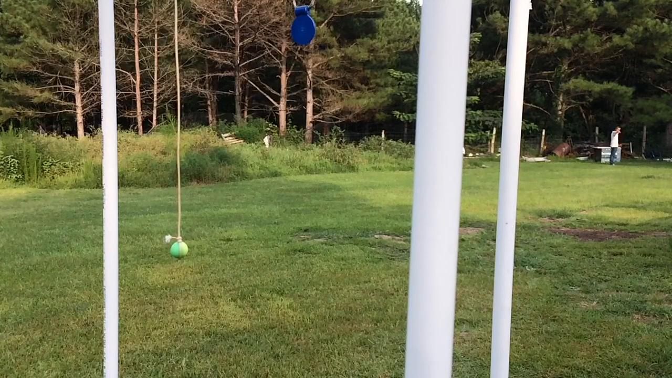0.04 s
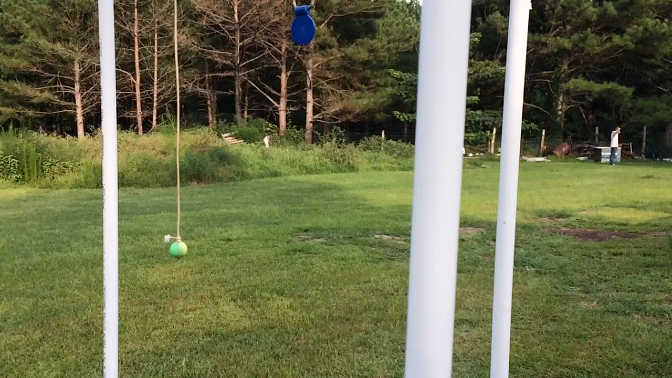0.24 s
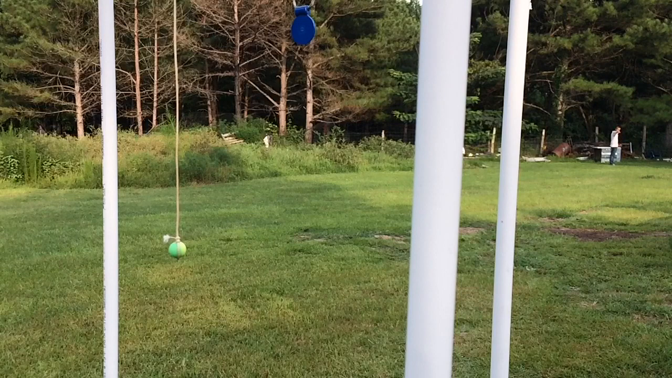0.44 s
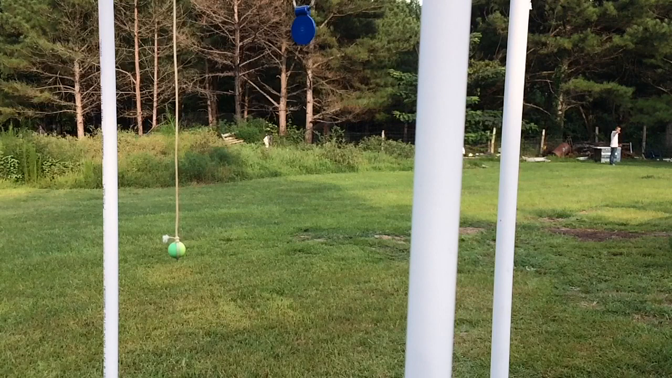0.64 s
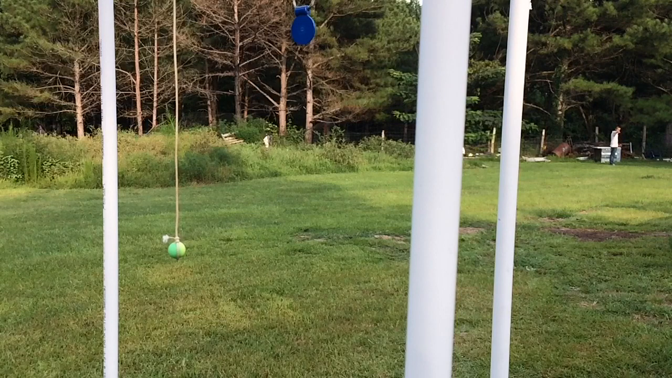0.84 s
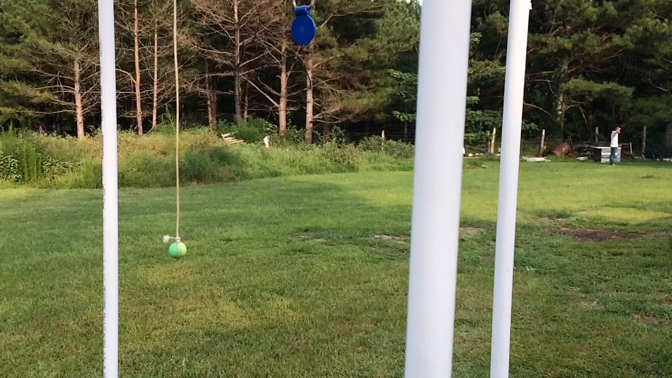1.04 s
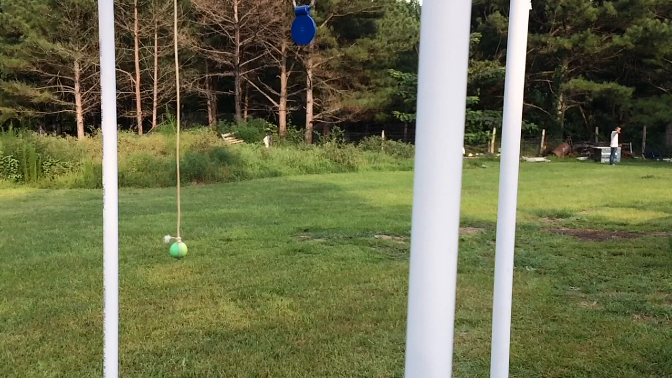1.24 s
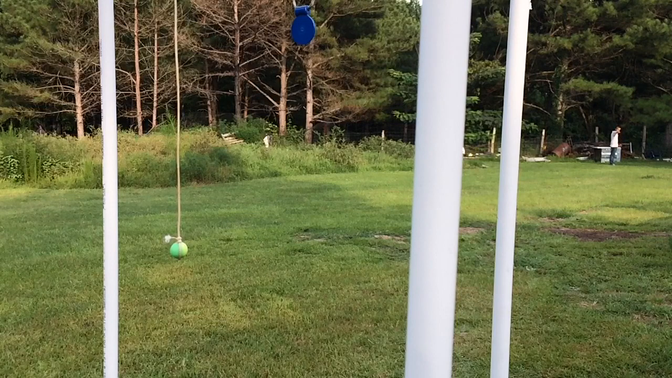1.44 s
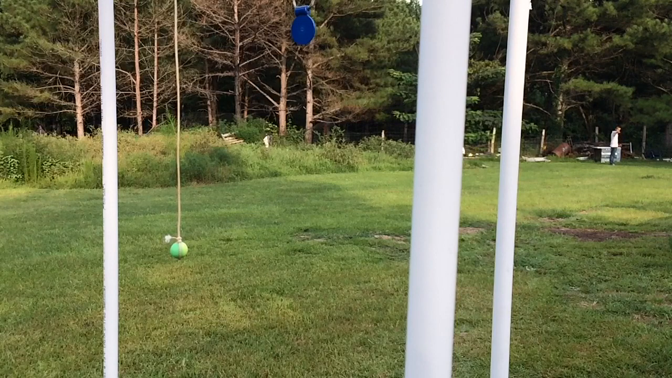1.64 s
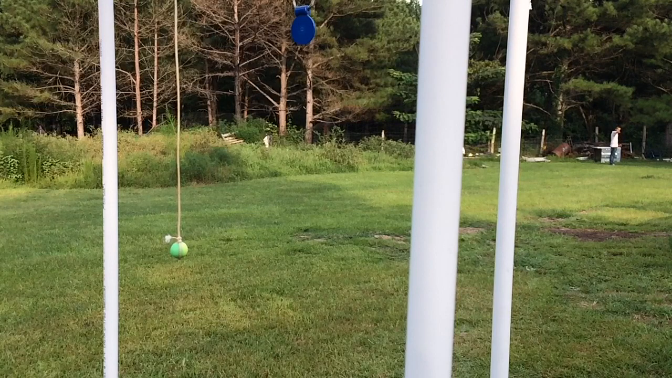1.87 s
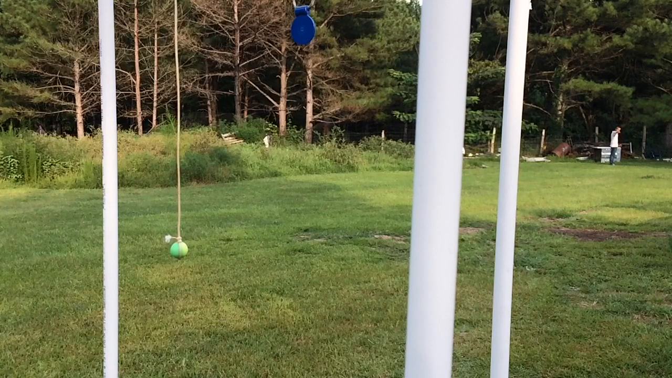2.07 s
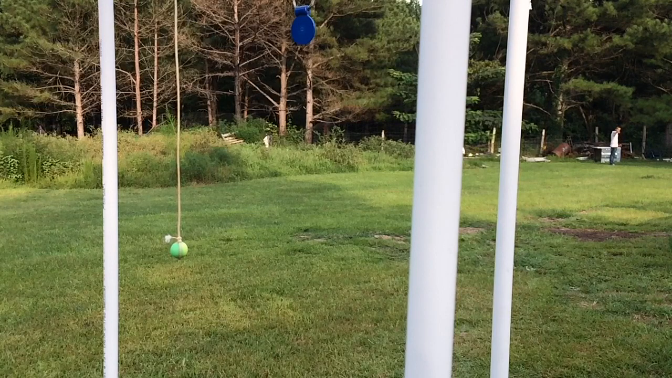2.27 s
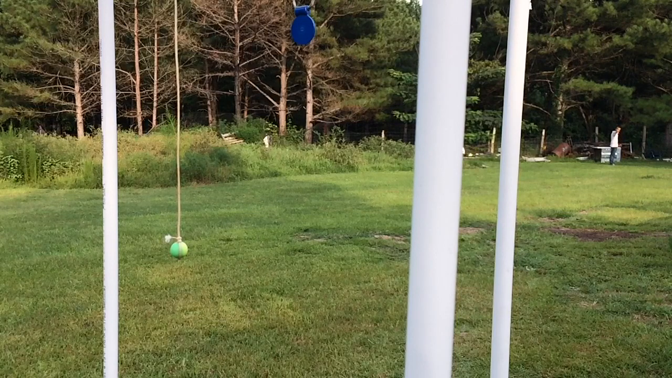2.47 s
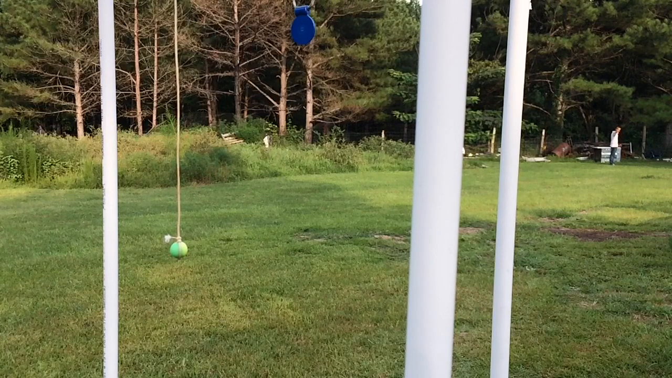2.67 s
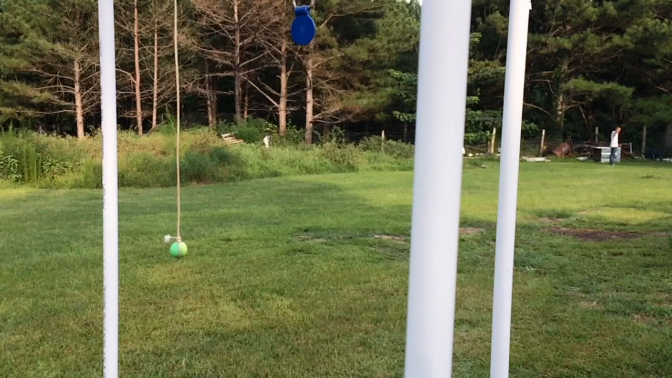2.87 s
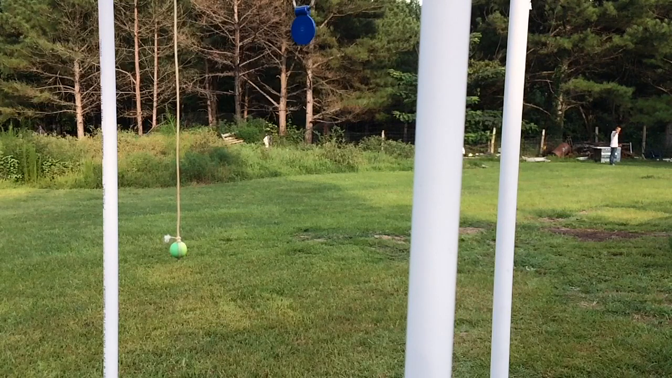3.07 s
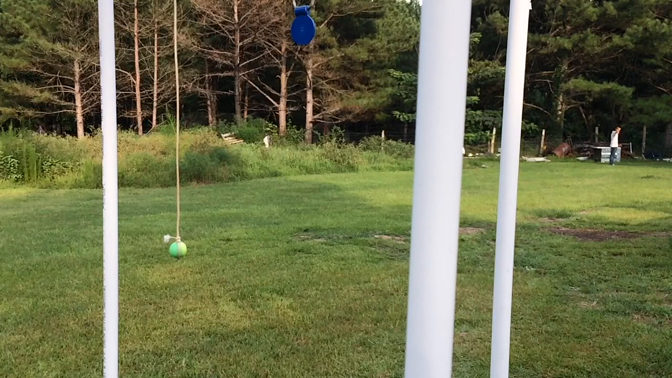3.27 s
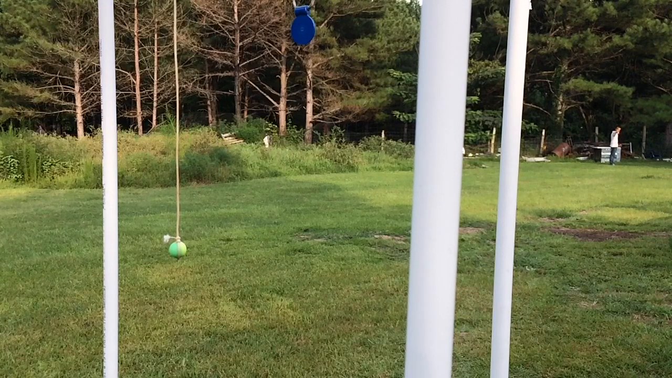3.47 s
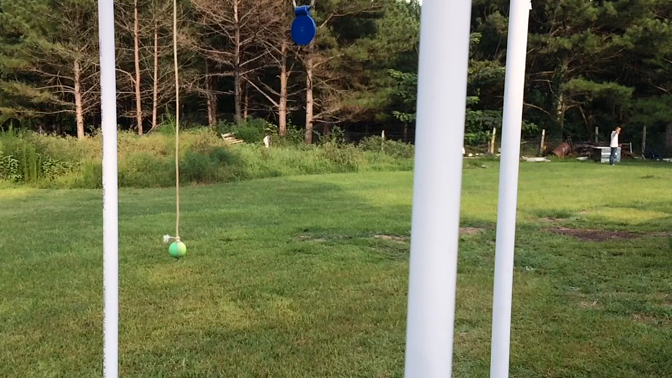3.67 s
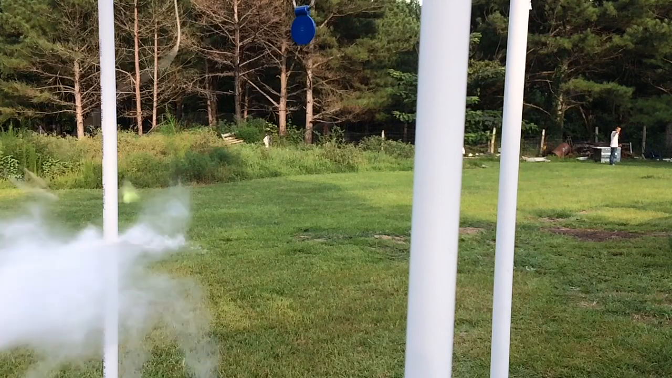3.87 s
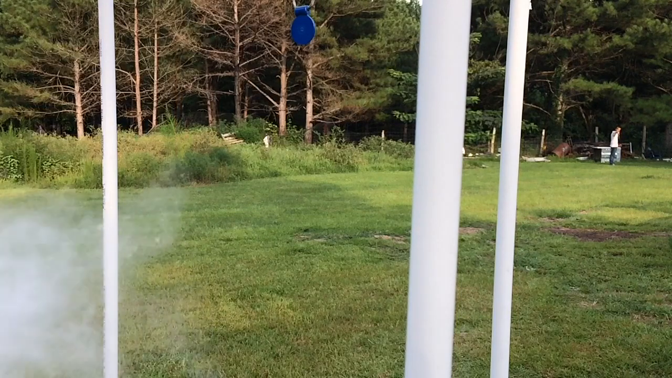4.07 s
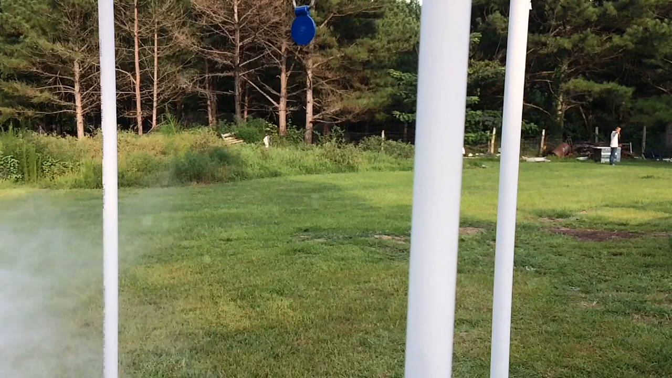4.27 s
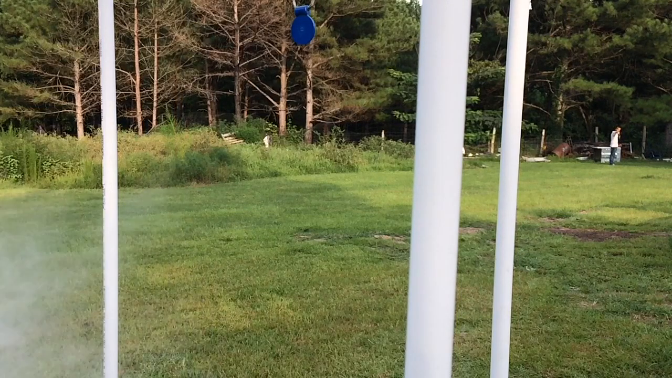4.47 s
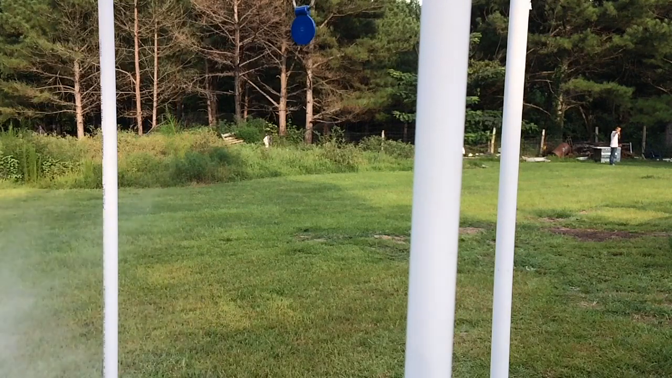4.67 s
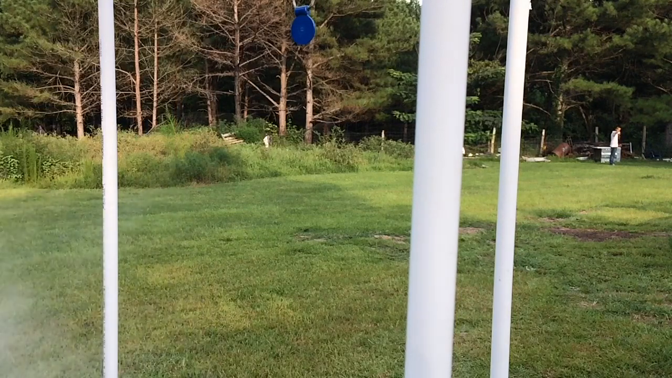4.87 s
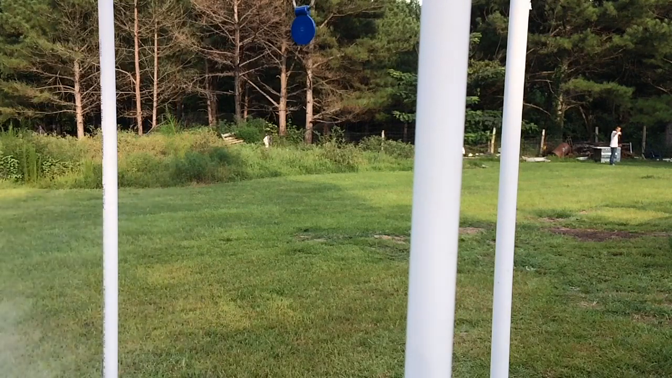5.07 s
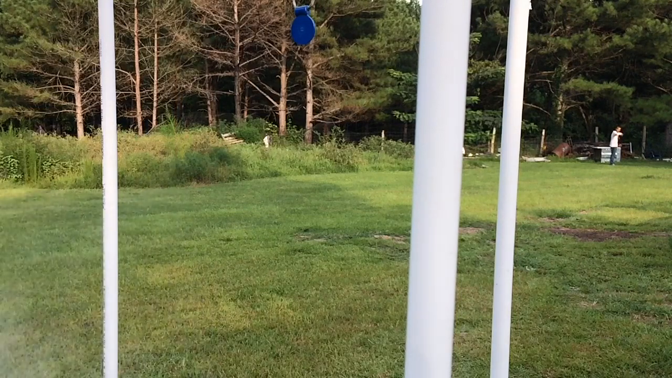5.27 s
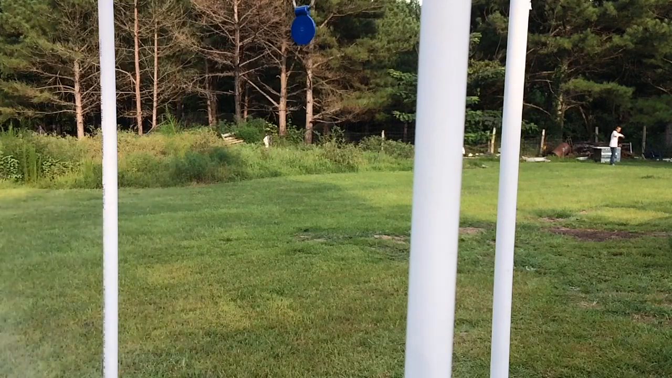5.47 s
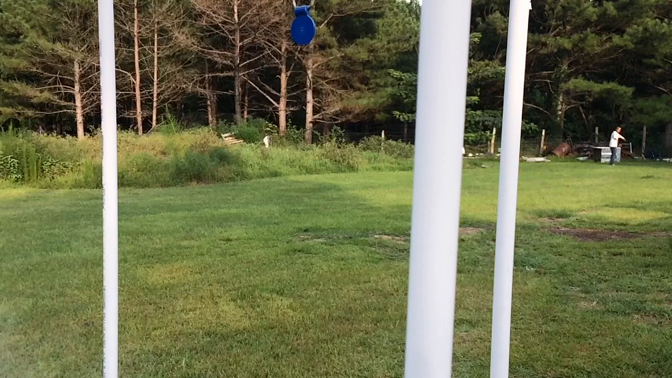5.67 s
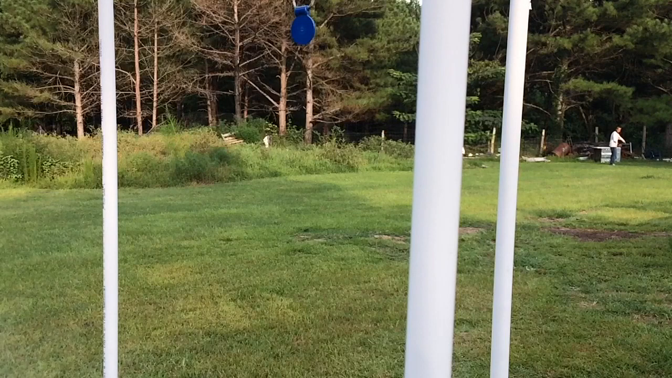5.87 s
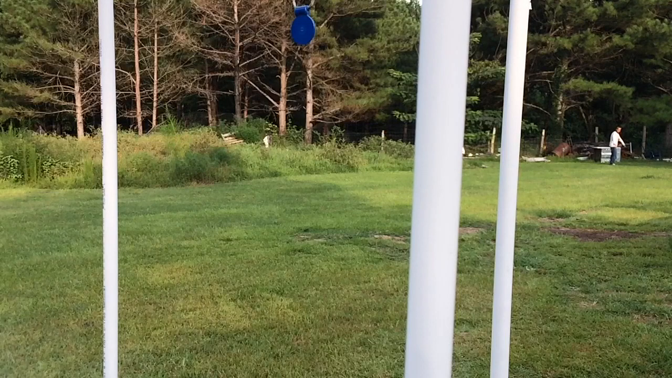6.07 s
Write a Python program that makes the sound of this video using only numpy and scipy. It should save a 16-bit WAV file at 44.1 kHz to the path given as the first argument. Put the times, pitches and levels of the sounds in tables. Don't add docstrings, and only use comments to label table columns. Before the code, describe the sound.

Insects trill on an open lawn, slow down two octaves, then a deep slingshot twang, sharp crack, growing hiss and a huge burst with pattering scraps.

```python
import sys
import numpy as np
from scipy import signal
from scipy.fft import rfft, irfft
from scipy.io import wavfile
from scipy.ndimage import uniform_filter1d, map_coordinates

SR = 44100
rng = np.random.default_rng(int(sys.argv[2]) if len(sys.argv) > 2 else 0)


def transcribe(signal):
    frames = np.atleast_2d(signal).T
    limited = np.clip(frames, -1, 1)
    pcm = np.round(limited * 32767).astype(np.int16)
    wavfile.write(sys.argv[1], SR, pcm)


def volts_from_db(level):
    exponent = np.asarray(level, float) / 20
    return 10 ** exponent


N = 269892

SLOWING = 4
LAWN_N = 3 * SR
BURST_S = 4.0537


def colour(x, points):
    hz, db = np.transpose(points)
    f = np.fft.rfftfreq(len(x), 1 / SR) + 1e-3
    gain = volts_from_db(np.interp(np.log(f), np.log(hz), db, left=-90, right=-90))
    y = irfft(rfft(x) * gain, len(x))
    return y / y.std()


def band(x, low_hz, high_hz, order=3):
    y = signal.sosfilt(signal.butter(order, [low_hz, high_hz], "band", fs=SR, output="sos"), x)
    return y / y.std()


def drift(rate_hz, size):
    r = np.exp(-2 * np.pi * rate_hz / SR)
    y = signal.lfilter([1], [1, -2 * r, r * r], rng.standard_normal(size + SR))[SR:]
    return (y - y.mean()) / y.std()


def ring(x, hz, t60_s):
    r = volts_from_db(-60 / (t60_s * SR))
    w = 2 * np.pi * hz / SR
    return signal.lfilter([0, np.sin(w)], [1, -2 * r * np.cos(w), r * r], x)


def playback():
    frame_s, first_frame_s = 1 / 30, 1.122
    ease_start_s, ease_end_s = 1.14, 1.635
    t = np.arange(N) / SR
    middle = first_frame_s + (np.floor((t - first_frame_s) / frame_s) + .5) * frame_s
    u = np.clip((middle - ease_start_s) / (ease_end_s - ease_start_s), 0, 1)
    speed = (1 / SLOWING) ** (u * u * (3 - 2 * u))
    splice_s = (np.diff(speed, prepend=1) != 0) * 9e-6
    return np.cumsum(speed / SR + splice_s)


def true_time(heard_s, true_s):
    return np.interp(heard_s, np.arange(N) / SR, true_s)


# pitch_hz, level_db (per Hz)
AIR = [(20, -12), (45, 0.5), (110, 2), (200, -10.5), (400, -16.5), (900, -17), (1600, -22.5), (2500, -28),
       (4000, -28.5), (6200, -31.5), (10500, -32), (13600, -34.5), (15700, -31), (15900, -69.5)]


def open_air():
    return volts_from_db(-5) * colour(rng.standard_normal(LAWN_N), AIR) * volts_from_db(.5 * drift(6., LAWN_N))


# pitch_hz, level_db (per Hz)
CHORUS_BAND = [(5800, -40), (6150, -26), (6620, -12), (6860, -3), (7670, 1.5), (8090, 0.5), (8500, -8),
               (8800, -21), (9400, -30.5), (10200, -47)]


def cicadas():
    flicker_db = 0.4 * drift(45., LAWN_N) + 1.5 * drift(250., LAWN_N)
    return colour(rng.standard_normal(LAWN_N) * volts_from_db(flicker_db), CHORUS_BAND)


def cricket(hz, width_hz, per_s):
    turn = np.cumsum(per_s * (1 + 0.034 * drift(8., LAWN_N))) / SR
    strokes = 0.38 + np.sin(np.pi * turn) ** 4
    return band(rng.standard_normal(LAWN_N) * strokes, hz - width_hz / 2, hz + width_hz / 2)


def chirps(times_s, levels_db):
    chirp_s, between_db = .085, -13.5
    t = np.arange(LAWN_N) / SR
    level = volts_from_db(np.mean(levels_db) + between_db)
    for s, db in zip(times_s, levels_db):
        level = level + volts_from_db(db) * np.cos(np.pi * np.clip((t - s) / chirp_s, -.5, .5)) ** 2
    return level


# pitch_hz, width_hz, level_db
CRICKETS = [
    (9550, 200, -67.5),
    (9940, 480, -76.5),
]
# first_chirp_s, period_s
BEATS = [
    (.125, .248),
    (-.004, .1605),
]
# chirp_s, level_db
LOW_CRICKET = [(.055, -68.5), (.228, -65.5), (.42, -64.5), (.5, -67), (.622, -65), (.835, -65), (.92, -69),
               (1.045, -62.5), (1.3, -66), (2.06, -62), (2.72, -67.5), (3.42, -69), (4.42, -66),
               (5.298, -68), (5.79, -67.5)]


def crickets(true_s):
    heard_s, db = np.transpose(LOW_CRICKET)
    out = chirps(true_time(heard_s, true_s), db) * cricket(9170, 260., 122.)
    for (hz, width_hz, level_db), (first_s, period_s) in zip(CRICKETS, BEATS):
        beats = first_s + period_s * np.arange(20)
        out = out + chirps(beats, level_db + 0 * beats) * cricket(hz, width_hz, 112.)
    return out


# start_s, end_s, pitch_hz, level_db, throat_hz
CROW = [
    (0.752, 0.992, 589, -78, 1700),
    (0.95, 1.063, 595, -83, 1190),
    (1.176, 1.38, 590, -60.5, 880),
    (1.3, 1.535, 580, -72.5, 1190),
    (1.56, 2.53, 1165, -70.5, 1165),
]


def cock(true_s):
    db_per_khz, floor_db = 12, -23.5
    t, out = np.arange(LAWN_N) / SR, 0
    waver = 1 + 0.0028 * drift(6.6, LAWN_N)
    flutter = volts_from_db(1.3 * drift(25., LAWN_N))
    for start, end, hz, level_db, throat_hz in CROW:
        a, b = true_time([start, end], true_s)
        shape = np.clip(np.minimum((t - a) / .04, (b - t) / .045), 0, 1)
        phase = 2 * np.pi * hz * np.cumsum(waver) / SR
        for k in range(1, 8):
            db = level_db + max(-db_per_khz * abs(k * hz - throat_hz) / 1e3, floor_db)
            out = out + shape * volts_from_db(db) * np.sin(k * phase)
    return np.sqrt(2) * out * flutter


def drop_masked(x, stretch=1):
    mask_db, reach_hz, luck_db = -11.5, 2600, 2.5
    f, _, z = signal.stft(x, SR * stretch, "cosine", nperseg=2048 * stretch)
    power = (abs(z[:1024]) ** 2).reshape(64, 16, -1).mean(axis=1)
    centre = f[8:1024:16]
    above = centre[:, None] - centre
    mask = (volts_from_db(-40 * abs(above) / reach_hz) * (above > 0)) @ power
    luck = volts_from_db(2 * luck_db * rng.standard_normal(power.shape))
    keep = (power * luck > mask * volts_from_db(2 * mask_db)) | (centre[:, None] < 9400)
    z[:1024] *= np.repeat(keep, 16, axis=0)
    return signal.istft(z, SR * stretch, "cosine", nperseg=2048 * stretch)[1][:len(x)]


def lawn():
    true_s = playback()
    duck_s = true_time([BURST_S, BURST_S + .03, BURST_S + 1.0, BURST_S + 1.33], true_s)
    heard = np.interp(np.arange(LAWN_N) / SR, true_s, np.arange(N) / SR)
    duck = volts_from_db(np.interp(heard, [BURST_S, BURST_S + .03, BURST_S + 1.0, BURST_S + 1.33], [0, -5, -5, 0]))
    insects = volts_from_db(-56.5) * (cicadas() + open_air()) + crickets(true_s)
    x = drop_masked(duck * insects + cock(true_s))
    fine = 4
    dense = irfft(rfft(x), fine * LAWN_N) * fine
    return map_coordinates(dense, [true_s * SR * fine], order=3)


# peak_s, level_db, half_length_s
GUSTS = [
    (3.496, -70, 0.1),
    (4.85, -75, 0.33),
    (5.154, -70, 0.054),
    (5.294, -62.5, 0.082),
    (5.68, -64, 0.038),
    (6.13, -47.5, 0.032),
]


def rumble():
    level_db, hold_s, fall_db_per_s = -47, 0.23, 110
    t = np.arange(N) / SR
    since = t - BURST_S
    rise = np.clip((since - .04) / 0.036, 0, 1)
    level = rise * volts_from_db(level_db - fall_db_per_s * np.maximum(since - hold_s, 0))
    for s, db, half_s in GUSTS:
        level = level + volts_from_db(db) * np.exp(-((t - s) / half_s) ** 2)
    return level * band(rng.standard_normal(N), 7.3, 92, order=2)


# start_s, level_db, knee_s, fall_db (per decade),
# tilt_db (per band)
TAILS = [(2.794, -61.5, .05, 5, 0), (2.814, -53, .05, 8, -4.5), (2.86, -51.5, 0.024, 14.5, -2.5),
         (2.966, -50, 0.066, 19.5, -0.5), (3.01, -45.5, 0.038, 19.5, -0.5), (4.06, -29.5, 0.06, 43.5, -2),
         (4.215, -45, 0.05, 24.5, -11), (4.45, -68.5, .4, 10.5, -2.5), (5.14, -53, 0.065, 22.5, 0),
         (5.241, -56.5, 0.69, 46, -2.5), (5.7, -69.5, .05, 20, 4.5)]
# low_hz, high_hz, offset_db
HISS_BANDS = [
    (205, 836, -4.5),
    (650, 2190, 1),
    (2130, 4300, -5.5),
]


def wash():
    launch_s, swallowed_s = 2.999, 4.031
    nearest_s = 0.037
    t, out = np.arange(N) / SR, 0
    flying = (t > launch_s) * np.clip((swallowed_s - t) / 0.0038, .3, 1) * (t < BURST_S)
    flight = flying * nearest_s / np.hypot(nearest_s, BURST_S - t)
    for k, (low_hz, high_hz, offset_db) in enumerate(HISS_BANDS):
        power = (volts_from_db(-37 - 3 * k) * flight) ** 2
        for s, db, knee_s, fall_db, tilt_db in TAILS:
            since = np.maximum(t - s, 0)
            heard = (s > BURST_S) | (t < BURST_S)
            tail_db = db + tilt_db * k - fall_db * np.log10(1 + since / knee_s)
            power = power + heard * np.minimum(since / .008, 1) * volts_from_db(2 * tail_db)
        grain = volts_from_db(1.0 * drift(21.0, N) + 0.87 * drift(30., N) + 1.7 * drift(200., N))
        out = out + volts_from_db(offset_db) * np.sqrt(power) * band(rng.standard_normal(N) * grain, low_hz, high_hz)
    return out


# time_s, pitch_hz, level_db
WHISTLE = [
    (3.699, 540, -74.5),
    (3.9, 450, -52.5),
    (4.032, 381.5, -45.5),
    (4.07, 300.7, -39.5),
    (4.201, 229.1, -50),
    (4.4, 185.7, -64.5),
    (4.55, 171.3, -78),
    (4.68, 151, -80),
]


def whistle():
    t = np.arange(N) / SR
    s, hz, db = np.transpose(WHISTLE)
    phase = 2 * np.pi * np.cumsum(np.interp(t, s, hz)) / SR
    breathy = drift(41.0, N) * np.sin(phase) + drift(30., N) * np.cos(phase)
    lines = 0
    for ratio, line_db in [(0.98, 1.5), (.55, 3.0), (0.34, 1.7)]:
        lines = lines + volts_from_db(line_db + 1.2 * drift(8.8, N)) * np.sin(ratio * phase)
    return volts_from_db(np.interp(t, s, db, left=-120, right=-120)) * np.where(t < BURST_S, breathy, lines)


def knocks(table, swell_s, octaves=.55, click=0.):
    out, t = np.zeros(N + SR), np.arange(-.03, .16, 1 / SR)
    for s, peak_db, hz, t60_s, treble_db in table:
        shape = np.where(t < 0, np.exp(t / swell_s), volts_from_db(-60 * t / max(t60_s, .004)))
        puff = rng.standard_normal(len(t)) * shape
        puff = puff - click * np.exp(-(t / .00012) ** 2)
        body = band(puff, hz / 2 ** (octaves / 2), hz * 2 ** (octaves / 2), order=2)
        hit = body + volts_from_db(treble_db) * band(puff, 970, 3800, order=2)
        at = round((s + t[0]) * SR)
        out[at:at + len(t)] += volts_from_db(peak_db) * hit / abs(hit).max()
    return out[:N]


# hit_s, peak_db, body_hz, treble_db
SCRAPS = [(3.104, -38, 960, 6), (3.176, -40, 754, -33), (4.391, -52, 580, -3), (4.404, -49, 320, -11),
          (4.468, -65, 1040, -24), (4.498, -56, 946, -16), (4.519, -56.5, 690, -16), (4.592, -49, 290, 0.5),
          (4.65, -58, 295, -0.5), (4.735, -55.5, 736, 3), (4.792, -55.5, 1462, -6),
          (5.047, -56.5, 303, -11.5), (5.106, -53.5, 385, -10.5), (5.212, -41.5, 510, -12),
          (5.272, -58.5, 369, -8), (5.306, -50, 905, 0), (5.374, -46.5, 547, -26), (5.407, -46, 820, -26),
          (5.416, -46, 1180, -41), (5.443, -48, 382, -31), (5.509, -55, 300, -1), (5.638, -60, 1590, -7),
          (5.728, -52, 301, 6.5)]


def falling_scraps():
    table = [(s, db + 4, hz, .018, treble_db) for s, db, hz, treble_db in SCRAPS]
    return knocks(table, .0007, octaves=1.6, click=1.5)


# hit_s, peak_db, body_hz, t60_s, treble_db
THUMPS = [
    (2.842, -21.5, 1242, 0.053, 4),
    (2.843, -30.5, 338, 0.11, -13.5),
    (2.83, -46, 60, 0.075, -35),
    (2.878, -41.5, 543, 0.012, -25),
    (4.058, -26.5, 397.5, 0.026, -28),
    (4.061, -19, 950, 0.013, -6.5),
    (4.076, -25.5, 807, 0.017, -8),
]


def thumps():
    return knocks(THUMPS, .006)


# hit_s, peak_db, body_hz, t60_s, treble_db
CRACKS = [(2.828, -32, 450, 0.039, -16), (2.999, -14.5, 1133, .03, -2), (3.0, -57, 93, 0.063, -42),
          (3.001, -39.5, 313, .04, -34), (3.0025, -20.5, 1880, 0.023, -13), (3.002, -27, 540, 0.049, -32),
          (3.0035, -16.5, 3380, 0.013, 1.5), (3.024, -36, 550, .015, -30),
          (3.0255, -23.5, 1700, 0.011, -15.5), (3.0265, -31, 2600, 0.016, -22),
          (4.209, -26.5, 1320, 0.021, -33), (4.21, -35, 2540, 0.024, -23), (4.2115, -30, 650, 0.015, -20),
          (4.212, -38.5, 326, 0.035, -30), (5.1415, -43.5, 500, 0.11, -7)]


def cracks():
    return knocks(CRACKS, .0007)


# pitch_hz, level_db, t60_s
SHELL = [
    (960, -1, 0.0072),
    (1740, -9, 0.0062),
    (2180, -14, 0.0018),
    (3070, -10, 0.005),
]
# time_s, depth (full scale), fall_s, return_s
SWINGS = [
    (3.998, -0.084, .015, 0.018),
    (4.029, 0.19, 0.0068, 0.0032),
    (4.0552, -0.77, 0.00037, 0.00026),
    (4.079, 0.12, .006, 0.017),
    (4.089, 0.11, 0.00096, 0.0034),
    (4.122, -0.067, .01, .015),
]


def burst():
    push_height, rise_s, fade_s = .66, .0011, 0.0074
    cut_hz, cut_slope = 13.5, 5
    t = np.arange(N) / SR
    after = np.maximum(t - BURST_S, 0)
    push = push_height * (1 - np.exp(-after / rise_s)) * np.exp(-after / fade_s)
    crack = np.zeros(N) + 1e-18
    crack[round((BURST_S + .0003) * SR)] = 1
    crack[round((BURST_S - .0002) * SR)] = 0.33
    shell = sum(volts_from_db(db) * ring(crack, hz, t60_s) for hz, db, t60_s in SHELL)
    dips = 0
    for s, depth, fall_s, return_s in SWINGS:
        dips = dips + depth * np.exp(-np.where(t < s, (s - t) / fall_s, (t - s) / return_s))
    f = np.fft.rfftfreq(N, 1 / SR)
    return irfft(rfft(push + shell - dips) / (1 + (cut_hz / (f + .01)) ** cut_slope), N)


def scene():
    top_hz, overload = 4225, .9
    hits = thumps() + cracks() + falling_scraps()
    shot = np.clip(whistle() + rumble() + hits + burst(), -overload, overload)
    top = signal.cheby2(10, 36, top_hz + 150, fs=SR, output="sos")
    steep, hiss = signal.sosfiltfilt(top, [shot, wash()])
    bed = lawn() + hiss
    slowed = np.arange(N) / SR >= TAILS[0][0]
    bed = np.where(slowed, drop_masked(bed, stretch=SLOWING), bed)
    gentle = signal.sosfiltfilt(signal.butter(2, 5000, fs=SR, output="sos"), shot)
    rough = volts_from_db(-39.5) * uniform_filter1d(abs(steep), size=300) ** 2 * rng.standard_normal(N)
    bend = volts_from_db(-30) * steep * abs(steep)
    edge = signal.butter(2, [top_hz, 8000], "band", fs=SR, output="sos")
    grit = signal.sosfilt(edge, rough + bend)
    return (bed + steep + volts_from_db(-47) * gentle + grit)[None]


def low_pass(x):
    return signal.sosfilt(signal.butter(12, 15750, fs=SR, output="sos"), x)


def record(dry):
    hissed = dry + volts_from_db(-98.5) * rng.standard_normal(dry.shape)
    return low_pass(hissed)


dry = scene()
out = record(dry)
transcribe(out)
```